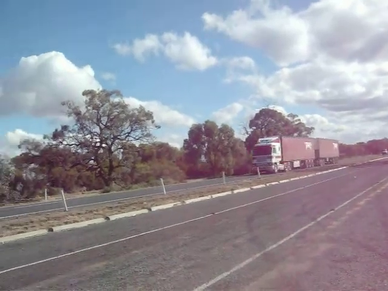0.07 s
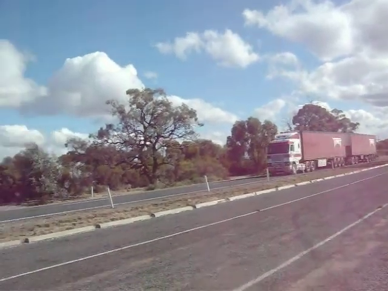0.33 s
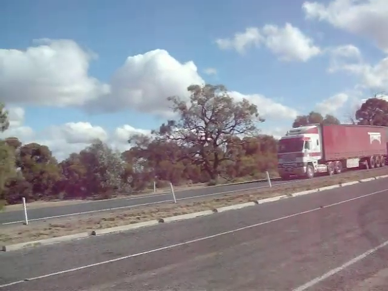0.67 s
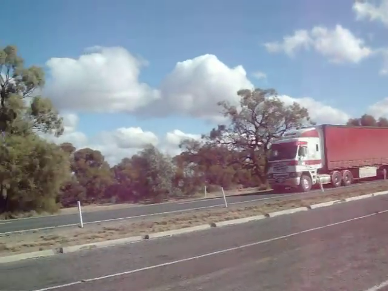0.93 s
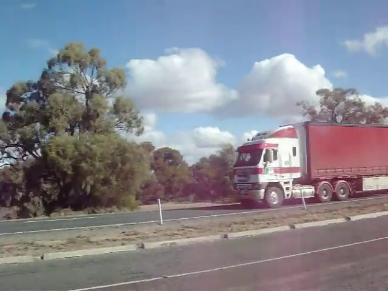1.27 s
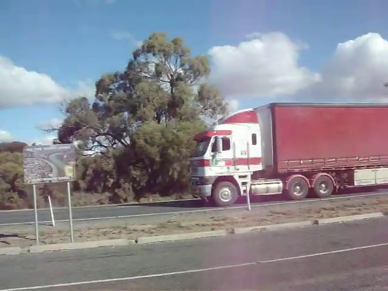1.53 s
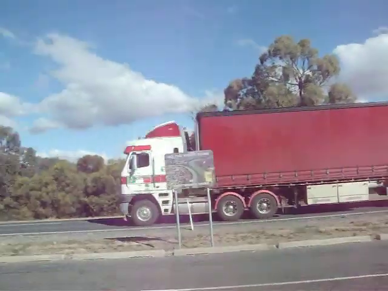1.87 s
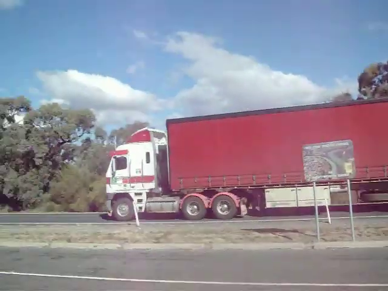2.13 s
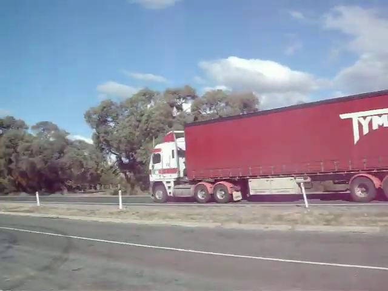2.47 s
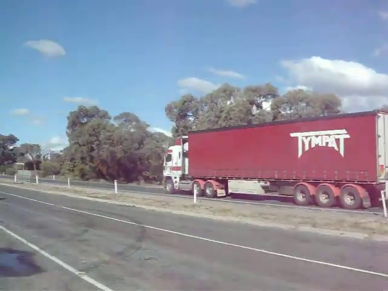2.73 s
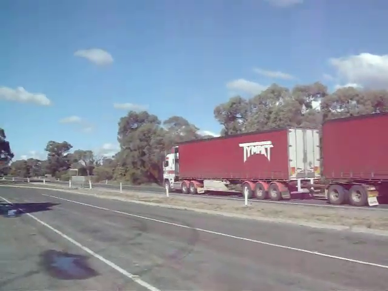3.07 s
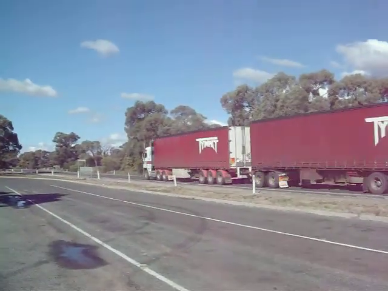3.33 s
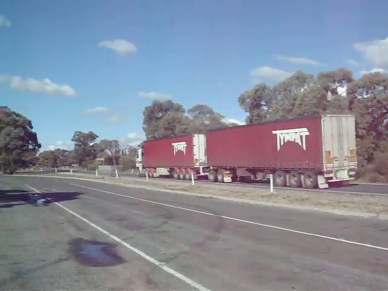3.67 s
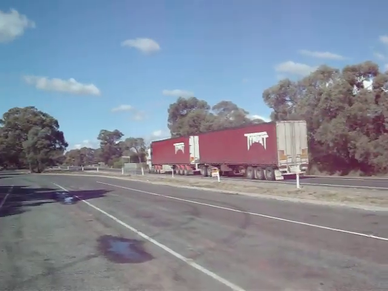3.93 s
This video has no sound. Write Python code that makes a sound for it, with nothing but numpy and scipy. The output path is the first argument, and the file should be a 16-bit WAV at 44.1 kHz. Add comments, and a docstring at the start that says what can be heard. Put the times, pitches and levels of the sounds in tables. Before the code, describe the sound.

A big truck rolls by on an open road, near the microphone, with a constant tyre roar, trailer rumble and thin hiss. The engine drone falls in pitch midway, then a single tick sounds, with soft wind buffeting underneath.

```python
"""A two-trailer truck drives past on a country road, close to a small camera.
Its tyres roar and sing, the diesel drones and the turbo whistles; the Doppler effect lowers
engine and turbo as the cab goes by. Wind rumbles on the microphone; a thin hiss flutters,
brief hums swell and fade, and there is one sharp tick.
The camera overloads and samples slowly, so aliasing folds the falling whistle into a rising one."""
import sys
import numpy as np
from scipy import signal
from scipy.fft import rfft, irfft
from scipy.io import wavfile

SR = 44100
rng = np.random.default_rng(int(sys.argv[2]) if len(sys.argv) > 2 else 0)


def to_wav(sig):
    """Store sig (one row per channel, or 1-D mono) as 16-bit WAV at the path in sys.argv[1].

    Samples outside -1..1 are clipped; the rate is SR.
    """
    pcm = np.clip(np.atleast_2d(sig), -1, 1) * 32767
    pcm = np.round(pcm).astype(np.int16)
    wavfile.write(sys.argv[1], SR, pcm.T)  # frames by channels


N = 176400
T = np.arange(N) / SR


def amp(db):
    """Amplitude ratio of a level: 20 dB is a factor of ten."""
    return 10 ** (np.asarray(db) / 20)


def unit_rms(x):
    """Normalisation to a root mean square of 1."""
    return x / np.sqrt(np.mean(x ** 2) + 1e-20)


def shaped_noise(spectrum):
    """Spectral shaping: white noise weighted by (Hz, dB) points, at rms 1."""
    points_hz, points_db = np.transpose(spectrum)
    hz = np.fft.rfftfreq(N, 1 / SR)
    gain = amp(np.interp(np.log(hz + 1), np.log(points_hz), points_db))
    return unit_rms(irfft(rfft(rng.standard_normal(N)) * gain, N))


def wander(rate_hz):
    """Random fluctuation of rms 1: noise through a Gaussian low-pass."""
    hz = np.fft.rfftfreq(N, 1 / SR)
    low_pass = np.exp(-.5 * (hz / rate_hz) ** 2)
    return unit_rms(irfft(rfft(rng.standard_normal(N)) * low_pass, N))


def narrowband_noise(hz, width_hz):
    """Random quadrature modulation spreads a tone into a band around its pitch."""
    phase = 2 * np.pi * np.cumsum(hz * np.ones(N)) / SR
    return unit_rms(wander(width_hz / 2) * np.cos(phase) + wander(width_hz / 2) * np.sin(phase))


# Spectra of the tyre roar and of the chassis and trailer rumble.
# Each row: frequency in Hz, relative spectral density in dB.
ROAR_SPECTRUM = [(60, -27.5), (110, -11.5), (190, -4.5), (300, -3), (400, -3.5), (520, 0.03), (700, -2),
                 (830, -7.5), (1000, -11), (1300, -19.5), (1800, -34), (2500, -46.5), (5000, -66.5)]
BODY_SPECTRUM = [(50, -25.5), (100, -15), (135, -7), (190, 0), (240, 1), (300, 0.7), (370, -2.5),
                 (480, -13), (900, -45.5)]
# The course of the pass. Each row: time in seconds, roar level in dB, tread level in dB,
# tread pitch in Hz, body level in dB, hiss level in dB.
PASS_COURSE = [(0, -9, -19, 604.5, -18.5, -43.5), (.5, -9, -13, 616.3, -16.5, -39),
               (1.1, -9.5, -12.5, 670.5, -15, -36.5), (1.5, -9.5, -13.5, 684.2, -16, -36),
               (2.299, -9, -13.5, 665.9, -16.5, -37.5), (2.799, -10, -16.5, 670.8, -13.5, -38),
               (3.2, -9.5, -12.5, 690, -17, -41.5), (3.6, -10.5, -12.5, 679, -20.5, -41.5),
               (4, -9.5, -14, 649.7, -23.5, -41.5)]

def rolling_noise():
    """Rolling contact radiates noise: tyres roar, treads sing and trailers rumble."""
    times, *columns = np.transpose(PASS_COURSE)
    roar_db, tread_db, tread_hz, body_db = (np.interp(T, times, c) for c in columns[:4])
    roar = amp(roar_db) * shaped_noise(ROAR_SPECTRUM)
    tread = amp(tread_db) * narrowband_noise(tread_hz, width_hz=184)
    body = amp(body_db) * shaped_noise(BODY_SPECTRUM)
    return roar + tread + body


# The spectrum of the hiss. Each row: frequency in Hz, relative spectral density in dB.
HISS_SPECTRUM = [(800, -12), (1500, 2), (2000, 0), (2400, -2.5), (2750, 4.5), (3200, -3.5), (4000, -6),
                 (5000, -11), (5600, -14), (7000, -30.5)]

def fluttering_hiss():
    """Random amplitude modulation makes a thin, high hiss flutter."""
    times, *_, hiss_db = np.transpose(PASS_COURSE)
    flutter_db = 2.5 * wander(rate_hz=18)
    return amp(np.interp(T, times, hiss_db) + flutter_db) * shaped_noise(HISS_SPECTRUM)


# The envelope of the tyre rush. Each row: time in seconds, level in dB.
RUSH_ENVELOPE = [(0, -31.5), (.9, -27.5), (1.3, -22), (2.2, -22.5), (3.25, -21.5), (4, -25.5)]

def tyre_rush():
    """Directivity: the upper band of tyre noise is strongest while the trailers are broadside."""
    level_db = np.interp(T, *np.transpose(RUSH_ENVELOPE))
    swell_db = 2.5 * wander(rate_hz=3.3)
    return amp(level_db + swell_db) * narrowband_noise(hz=858.6, width_hz=300)


TRUCK_M_PER_S, SOUND_M_PER_S = 21.5, 343
CLOSEST_M, CLOSEST_AT_S = 10.0, 1.87

def cab_path():
    """A moving source: nearness (1 at closest), rear aspect (0 to 1) and Doppler factor."""
    along_m = TRUCK_M_PER_S * (T - CLOSEST_AT_S)
    range_m = np.hypot(along_m, CLOSEST_M)
    receding = along_m / range_m
    doppler = 1 / (1 + TRUCK_M_PER_S / SOUND_M_PER_S * receding)
    return CLOSEST_M / range_m, (1 + receding) / 2, doppler


FIRING_HZ, FIRING_WAVER = 75.36, .008
# The engine orders. Each row: multiple of the firing rate, level ahead in dB, level behind in dB.
ENGINE_ORDERS = [(1, -25, -36.5), (1.5, -26, -30.5), (2, -31, -33), (2.5, -22.5, -32), (3, -33, -31.5),
                 (4, -24.5, -32.5), (4.5, -25.5, -32)]

def diesel_engine():
    """Periodic firing gives a series of orders, Doppler-shifted and unequal ahead and behind."""
    _, behind, doppler = cab_path()
    firing_hz = FIRING_HZ * doppler * (1 + FIRING_WAVER * wander(rate_hz=6))
    cycles = np.cumsum(firing_hz) / SR
    out = np.zeros(N)
    for order, ahead_db, behind_db in ENGINE_ORDERS:
        level_db = ahead_db + (behind_db - ahead_db) * behind + 2.5 * wander(rate_hz=4.8)
        out += amp(level_db) * np.sin(2 * np.pi * (order * cycles + rng.random()))
    return out


def turbo_whistle(pitch_hz=6930, ahead_db=-42.5, rear_loss_db=8):
    """A directional source: the whistle radiates mostly forwards and falls by the Doppler effect."""
    nearness, behind, doppler = cab_path()
    gain = amp(ahead_db - rear_loss_db * behind) * nearness ** 0.43  # gentler than 1 / distance
    return gain * narrowband_noise(pitch_hz * doppler, width_hz=140)


# The course of the whine. Each row: time in seconds, pitch in Hz, level in dB.
WHINE_COURSE = [(0, 2690, -37.5), (.4, 2744, -49), (.85, 2780, -43.5), (1.701, 2834, -51),
                (2.8, 2964, -47.5), (4, 2830, -56.5)]

def whine():
    """Narrowband noise is heard as a faint, blurred pitch, clearest as the truck approaches."""
    times, hz, db = np.transpose(WHINE_COURSE)
    return amp(np.interp(T, times, db)) * narrowband_noise(np.interp(T, times, hz), width_hz=130)


# The spectrum of the wind. Each row: frequency in Hz, relative spectral density in dB.
WIND_SPECTRUM = [(10, 0.5), (25, -0.5), (45, -3.5), (80, 0.5), (200, -13.5), (600, -46.5)]

def wind_buffeting(level_db=-35, gust_db=4.5):
    """Turbulent pressure on the microphone makes a low, gusting rumble."""
    return amp(level_db + gust_db * wander(rate_hz=4)) * shaped_noise(WIND_SPECTRUM)


# Brief low and middle hums. Each row: time of the peak in seconds, length in seconds,
# pitch in Hz, width in Hz, peak level in dB.
HUM_SWELLS = [(.1, .5, 124.9, 30, -23), (0.394, .6, 606.5, 18, -21.5), (2.179, .4, 203, 18, -19.5),
              (2.799, .8, 303.3, 20, -19.5), (2.877, 0.22, 531, 12, -16.5), (3.75, .4, 408.8, 14, -21),
              (3.901, .8, 117.9, 25.1, -28), (3.946, 0.35, 604.8, 10.1, -17)]

def brief_hums():
    """Random frequency modulation blurs each hum, which swells and fades in a Gaussian envelope."""
    out = np.zeros(N)
    for peak_s, length_s, hz, width_hz, db in HUM_SWELLS:
        phase = 2 * np.pi * np.cumsum(hz + width_hz / 2 * wander(rate_hz=15)) / SR
        envelope = np.exp(-2 * ((T - peak_s) / length_s) ** 2)
        out += amp(db) * envelope * np.sqrt(2) * np.sin(phase)
    return out


# The spectrum of the tick. Each row: frequency in Hz, relative spectral density in dB.
TICK_SPECTRUM = [(400, -10), (1500, 1), (2300, -4), (3000, 0), (4000, -11), (5000, -7), (6500, -24)]

def tick(start_s=2.996, level_db=-13.5, decay_s=0.0014):
    """A transient as the first trailer goes by: bright noise with a fast exponential decay."""
    envelope = (T >= start_s) * np.exp(-abs(T - start_s) / decay_s)
    return amp(level_db) * envelope * shaped_noise(TICK_SPECTRUM)


def scene():
    """Superposition: all the sounds add in one channel."""
    mix = (rolling_noise() + fluttering_hiss() + tyre_rush() + diesel_engine() + turbo_whistle()
           + whine() + wind_buffeting() + brief_hums() + tick())
    return mix[None]


SAMPLE_STEP = 4  # the camera samples at SR / 4
INPUT_CEILING, OUTPUT_CEILING = .702, .7075  # full scale is 1
SMOOTHING_HZ, IMAGE_LEAK_DB, BAND_LIMIT_HZ = 5420, -77, 15850

def record(dry):
    """Aliasing: slow, unfiltered sampling folds the treble down. Overload flattens the peaks."""
    overloaded = np.clip(dry[0], -INPUT_CEILING, INPUT_CEILING)
    pulses = np.zeros(N)
    pulses[::SAMPLE_STEP] = SAMPLE_STEP * overloaded[::SAMPLE_STEP]
    smoothing = signal.firwin(111, SMOOTHING_HZ, window=("kaiser", 8), fs=SR)
    smoothed = signal.oaconvolve(pulses, smoothing, "same")
    images = amp(IMAGE_LEAK_DB) * pulses  # mirrored spectra leak past the smoothing filter
    out = np.clip(smoothed, -OUTPUT_CEILING, OUTPUT_CEILING) + images
    band_limit = signal.firwin(511, BAND_LIMIT_HZ, window=("kaiser", 9), fs=SR)
    return signal.oaconvolve(out, band_limit, "same")[None]


dry = scene()
out = record(dry)
to_wav(out)
```